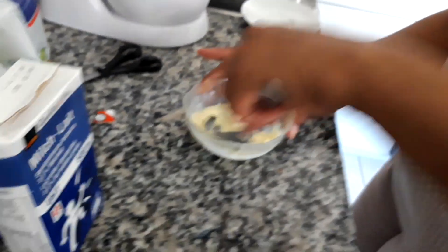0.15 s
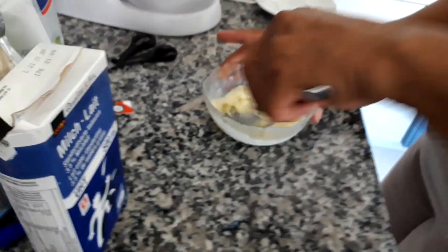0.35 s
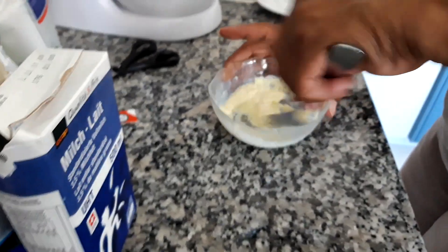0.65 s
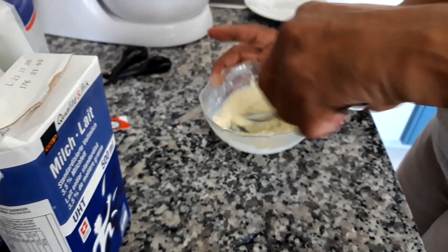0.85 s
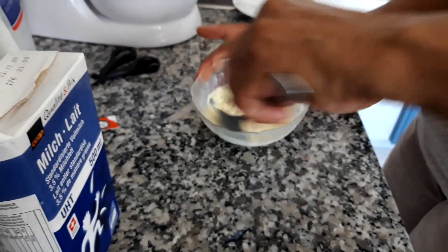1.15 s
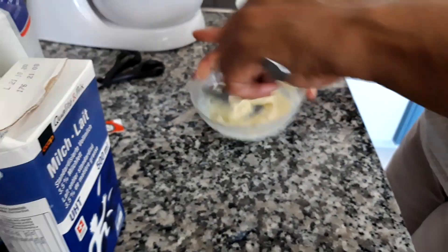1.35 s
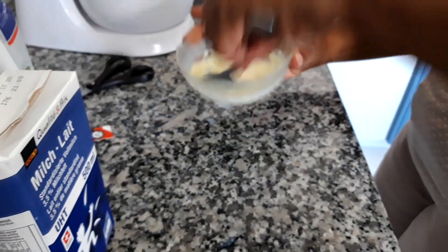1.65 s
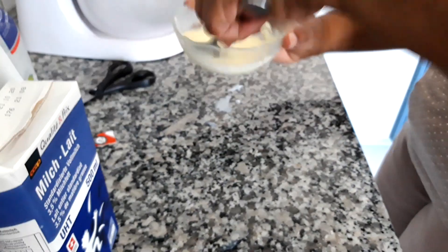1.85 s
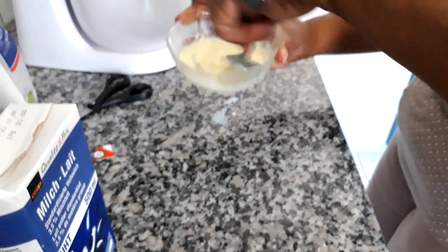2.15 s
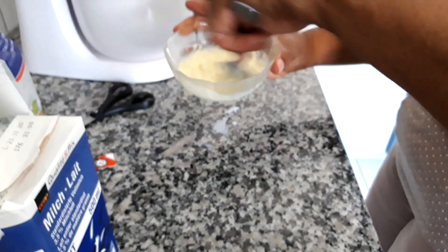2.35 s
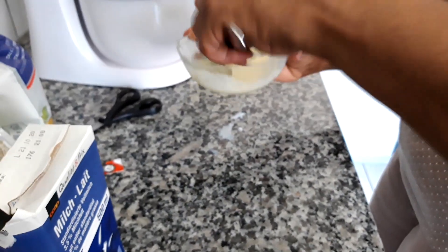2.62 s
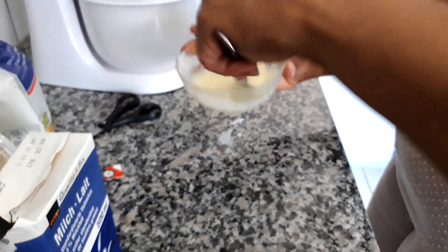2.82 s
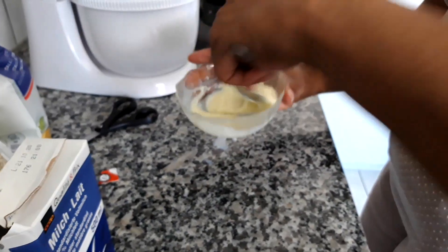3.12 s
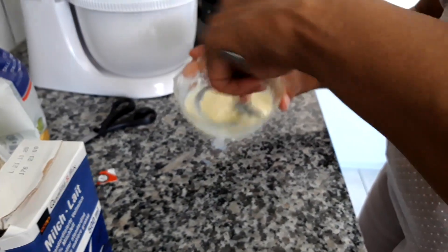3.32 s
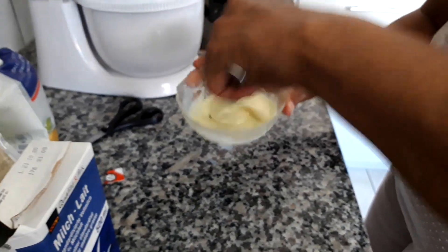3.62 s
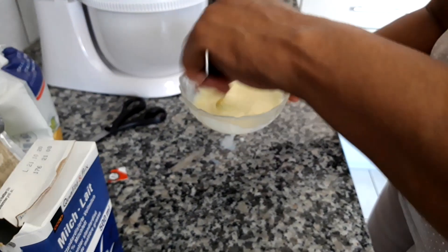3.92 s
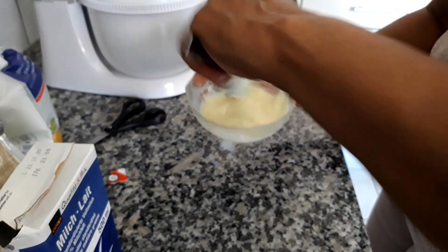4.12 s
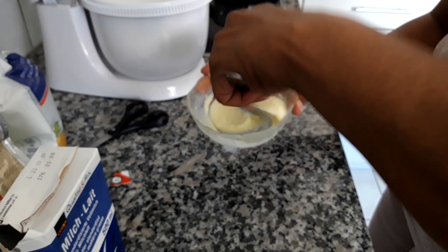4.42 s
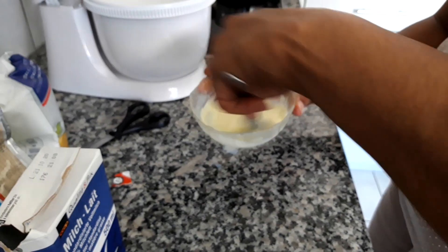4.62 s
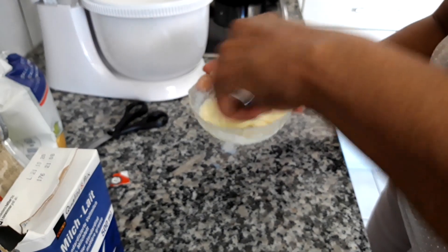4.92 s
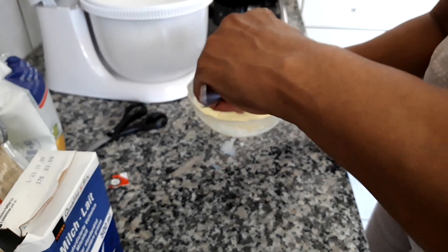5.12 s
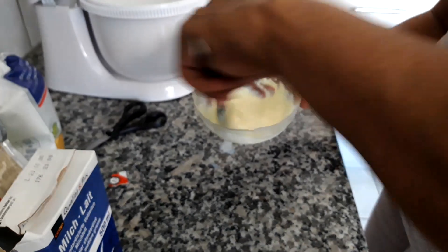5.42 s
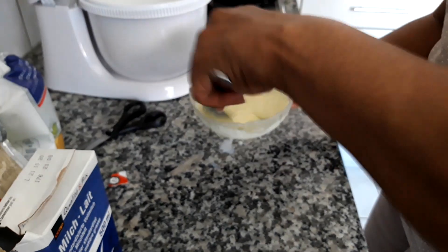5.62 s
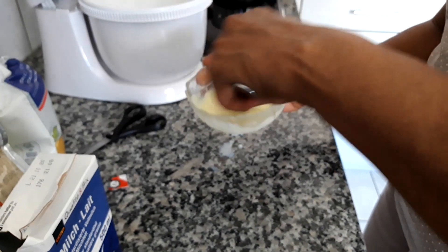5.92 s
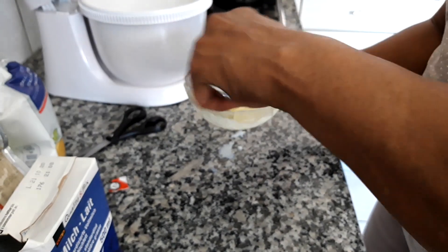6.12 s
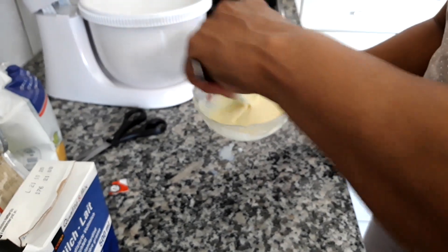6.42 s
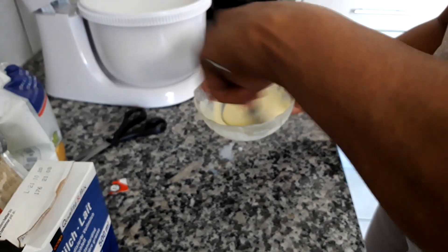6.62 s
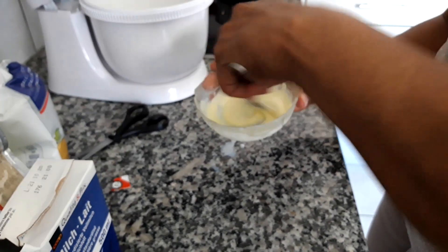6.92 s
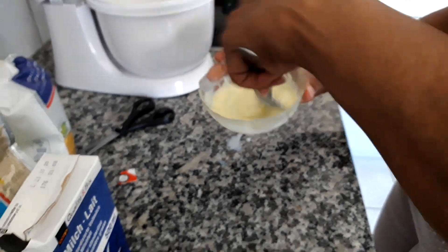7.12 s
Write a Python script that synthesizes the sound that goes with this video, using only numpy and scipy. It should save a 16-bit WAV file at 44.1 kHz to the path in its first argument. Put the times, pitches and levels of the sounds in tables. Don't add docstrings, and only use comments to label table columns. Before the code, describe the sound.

Close in a hard, lively kitchen, a metal spoon stirs thick paste in a small glass bowl. Bright, short clinks arrive several times a second, joined by hollow knocks and soft, gritty scraping. For the first second the bowl also rubs and rumbles on a stone counter; after one more low bump it is held in the air and the stirring continues. Short room echoes follow each hit over a faint distant appliance hum.

```python
import sys
import numpy as np
from scipy import signal
from scipy.io import wavfile
from scipy.ndimage import uniform_filter1d, minimum_filter1d

SR = 44100
rng = np.random.default_rng(int(sys.argv[2]) if len(sys.argv) > 2 else 0)


def master(y):
    cut = np.clip(np.atleast_2d(y).T, -1, 1)
    pcm = np.round(cut * 32767)
    wavfile.write(sys.argv[1], SR, pcm.astype(np.int16))


def volts_from_decibels(level):
    exponent = np.asarray(level, float) / 20
    return 10 ** exponent


N = 320166
TIME_S = np.arange(N) / SR


def unit(x):
    return x / np.sqrt(np.mean(x ** 2) + 1e-20)


def in_time(rows):
    start_s, *columns = np.transpose(rows)
    return [np.interp(TIME_S, start_s, column) for column in columns]


def at_hz(points, hz):
    point_hz, value = np.array(points)[:, :2].T
    return np.interp(np.log(hz), np.log(point_hz), value)


def band(x, low_hz, high_hz):
    return signal.sosfilt(signal.butter(2, [low_hz, high_hz], "band", fs=SR, output="sos"), x)


def above(x, edge_hz):
    return signal.sosfilt(signal.butter(4, edge_hz, "high", fs=SR, output="sos"), x)


def add_at(out, start_s, sound):
    out[round(start_s * SR):][:len(sound)] += sound


# pitch_hz [Hz], level_db [dB per Hz]
HUSH_SPECTRUM = [
    (25, -33),
    (60, -8),
    (100, -1),
    (170, -4),
    (240, -46),
    (400, -15),
    (900, -4.5),
    (2000, -49),
    (5000, -22),
    (16000, -15),
]


def hush():
    edges_hz = 25 * 2 ** (np.arange(29) / 3)
    white = rng.standard_normal((2, N))
    total = np.zeros(N)
    for k, (low, high) in enumerate(zip(edges_hz, edges_hz[1:])):
        centre_hz = np.sqrt(low * high)
        total += volts_from_decibels(at_hz(HUSH_SPECTRUM, centre_hz)) * band(white[k % 2], low, high)
    return volts_from_decibels(-66) * unit(total)


# start_s [s], level_db [dB]
RUMBLE_LEVEL = [(0.0, -40), (0.18, -58), (0.26, -43), (0.44, -55), (0.51, -40.5), (0.58, -51), (.8, -52.5),
                (.88, -67), (.96, -69), (1.05, -84), (1.23, -75), (1.31, -44), (1.43, -74), (4.83, -87),
                (6.95, -77), (7.1, -60), (7.26, -80)]


def rumble():
    white = rng.standard_normal((2, N))
    deep = unit(band(band(white[0], 82, 116), 95, 180))
    upper = unit(band(band(white[1], 130, 243), 92, 400))
    return volts_from_decibels(in_time(RUMBLE_LEVEL)[0] - 5.5) * unit(deep + volts_from_decibels(5.0) * upper)


# pitch_hz [Hz], t60_s [s], echo_db [dB energy above the direct sound]
ROOM = [
    (199, 0.16, -1),
    (440, 0.18, 0),
    (880, 0.25, 2),
    (1930, 0.23, 6.5),
    (3500, 0.24, 5),
    (7000, 0.22, 4),
    (14000, 0.2, 2.5),
]


def kitchen(x):
    gap_s, build_s, pattern_s = 0.0023, 0.0002, 0.31
    t = np.arange(SR // 2) / SR
    rise = 1 - np.exp(-np.maximum(t - gap_s, 0) / build_s)
    hz, _, echo_db = np.transpose(ROOM)
    turn = (TIME_S // pattern_s) % 3
    out = np.zeros(N)
    for k, white in enumerate(rng.standard_normal((3, len(t)))):
        tail = np.zeros(len(t))
        for centre_hz in 110 * 2 ** np.arange(8):
            octave = band(white, centre_hz / np.sqrt(2), centre_hz * np.sqrt(2))
            dying = unit(octave * volts_from_decibels(-60 * t / at_hz(ROOM, centre_hz)) * rise)
            wet = volts_from_decibels(np.interp(np.log(centre_hz), np.log(hz), echo_db))
            tail += wet * dying * np.sqrt(centre_hz / SR / len(t))
        out += signal.fftconvolve(x * (turn == k), np.sqrt(2) * tail)[:N]
    return out


# start_s [s], scrape_db [dB], paste_db [dB]
PRESSURE = [(0.0, -46.5, -46.5), (0.35, -44, -48), (0.7, -51, -48), (1.0, -72, -56), (1.3, -44.5, -53),
            (1.85, -52.5, -56), (2.25, -51, -63.5), (2.55, -54.5, -63), (3.2, -49, -54.5),
            (3.75, -50.5, -57.5), (4.2, -48.5, -70), (4.7, -54.5, -58), (5.1, -48.5, -58.5),
            (5.4, -55, -61.5), (5.9, -55, -60), (6.3, -55, -60), (6.65, -49.5, -57), (7.26, -47.5, -56.5)]
# share of the stroke [0-1], level_db [dB]
STROKE = [
    (0.0, 5.5),
    (0.45, -2.5),
    (0.7, -2),
    (0.9, -9.5),
    (1.0, 2.5),
]
# start_s [s], half_length_s [s], lost_db [dB]
STALLS = [
    (0.992, 0.05, 7.5),
    (1.158, 0.013, 9),
    (2.59, 0.027, 17),
    (2.921, 0.054, 11.5),
    (3.794, 0.074, 3),
    (4.094, 0.015, 17),
    (5.24, 0.067, 11),
    (6.368, 0.017, 4),
    (5.473, 0.059, -3),
    (6.574, 0.022, 7),
]


def drag_levels():
    starts = [row[0] for row in CLINKS] + [N / SR + 0.052]
    share = np.interp(TIME_S, starts, np.arange(len(starts))) % 1
    swell_db = np.interp(share, *np.transpose(STROKE))
    scrape_db, paste_db = in_time(PRESSURE)
    lost_db = np.zeros(N)
    for start_s, half_length_s, level_db in STALLS:
        lost_db += level_db * np.exp(-((TIME_S - start_s) / half_length_s) ** 2)
    return paste_db + 0.96 * swell_db - lost_db, scrape_db + swell_db - lost_db


def drag(groups, level_db, slips_per_s, spread_db, clump_db=6):
    size = np.minimum(rng.exponential(1, N), np.pi)
    slips = (rng.random((3, N)) < slips_per_s / SR) * volts_from_decibels(spread_db * size) * rng.choice([-1, 1], N)
    knots = rng.standard_normal((3, N // 900 + 2))
    clumps = np.array([np.interp(np.arange(N) / 900, np.arange(len(k)), k) for k in knots])
    slips *= volts_from_decibels(clump_db * clumps)
    out = np.zeros(N)
    for k, (hz, mode_db, t60_s) in enumerate(np.concatenate(groups)):
        radius, turn = volts_from_decibels(-60 / (t60_s * SR)), 2 * np.pi * hz / SR
        resonator = [0, np.sin(turn)], [1, -2 * radius * np.cos(turn), radius ** 2]
        out += volts_from_decibels(mode_db) * signal.lfilter(*resonator, slips[k % 3] + 1e-18)
    return volts_from_decibels(level_db) * unit(out)


def grit(scrape_db):
    cracks_per_s = 200
    size = np.minimum(rng.exponential(1, N), 4)
    cracks = (rng.random(N) < cracks_per_s / SR) * volts_from_decibels(3.4 * size) * rng.choice([-1, 1], N)
    return volts_from_decibels(scrape_db - 16.5) * unit(band(cracks, 1700, 13500))


# start_s [s], length_s [s], level_db [dB], pitch_hz [Hz]
SKIDS = [(0.67, 0.18, -59, 4900), (3.807, 0.026, -64, 3830), (5.096, 0.046, -35.5, 2710),
         (5.415, 0.017, -50, 3320), (6.7, 0.016, -41, 7400), (6.455, 0.092, -51, 2560),
         (1.5, 0.11, -58, 1140), (0.43, 0.019, -35, 2170), (2.8, 0.0091, -30, 9500),
         (7.119, 0.023, -32, 3760), (6.39, 0.033, -36.5, 2500), (0.41, 0.018, -43, 1200),
         (3.303, 0.016, -37, 4200), (5.75, 0.025, -34, 3350)]


def skids():
    slips_per_s, half_width = 1300, 0.061
    t, out = np.arange(SR // 4) / SR, np.zeros(N + SR)
    for start_s, length_s, level_db, pitch_hz in SKIDS:
        swell = np.sin(np.pi * np.clip(t / length_s, 0, 1))
        odds, size = rng.random((2, len(t)))
        slips = (odds < slips_per_s / SR) * (2 * size - 1)
        squeal = unit(band(slips, pitch_hz * (1 - half_width), pitch_hz * (1 + half_width)))
        add_at(out, start_s, volts_from_decibels(level_db) * swell * squeal)
    return out[:N]


# start_s [s], level_db [dB peak], pitch_hz [Hz]
THUMPS = [(1.3, -27.5, 563), (1.648, -37, 565), (2.066, -36.5, 470), (2.298, -27.5, 643),
          (2.625, -27.5, 550), (3.021, -37, 641), (3.689, -31, 643), (3.888, -29.5, 721), (4.773, -32, 641),
          (5.865, -33.5, 641), (5.903, -35.5, 641), (5.96, -45, 659), (6.115, -33.5, 560),
          (6.384, -31, 799), (6.799, -37, 649)]


def thumps():
    cycles = 4.3
    t, out = np.arange(SR // 40) / SR, np.zeros(N + SR)
    for start_s, level_db, pitch_hz in THUMPS:
        fade_db = -60 * t * pitch_hz / (2 * cycles)
        add_at(out, start_s, volts_from_decibels(level_db - 1 + fade_db) * np.sin(2 * np.pi * pitch_hz * t))
    return out[:N]


# start_s [s], level_db [dB], pitch_hz [Hz lowest ring], upper_db [dB above it]
PINGS = [(0.2175, -24, 4850, -5), (0.7, -34, 4620, -3), (0.7897, -29, 4030, -7), (0.849, -37, 4100, -10),
         (0.885, -37, 4150, -10), (0.9113, -31.5, 4250, -12), (0.934, -48, 4200, -7),
         (1.9475, -20, 4440, 7), (2.6265, -42, 4500, -13), (3.5565, -37, 4250, -10), (5.743, -26, 4280, 2),
         (6.596, -30, 8500, -5), (6.896, -28, 3740, -11), (7.13, -34, 3530, -9)]
# pitch_hz [Hz], level_db [dB]
SPOON = [
    (6120, -1),
    (8500, 0),
]


def pings():
    t60_s, rise_s = 0.02, 0.00049
    t, out = np.arange(SR // 10) / SR, np.zeros(N + SR)
    envelope = volts_from_decibels(-60 * t / t60_s) * (1 - np.exp(-t / rise_s))
    for start_s, level_db, pitch_hz, upper_db in PINGS:
        rings = np.sin(2 * np.pi * pitch_hz * t)
        for ring_hz, ring_db in SPOON:
            rings += volts_from_decibels(upper_db + ring_db) * np.sin(2 * np.pi * ring_hz * t)
        add_at(out, start_s, volts_from_decibels(level_db) * envelope * rings)
    return out[:N]


# start_s [s], level_db [dB peak]
TICKS = [(0.2156, -16), (0.4636, -12), (0.7002, -18), (0.8794, -32), (1.188, -31), (1.4566, -19),
         (1.947, -8), (2.185, -14), (2.2967, -25), (2.6254, -28), (3.299, -6), (3.5563, -20), (4.2602, -27),
         (4.6154, -26), (4.8423, -15), (5.0554, -37), (5.0988, -30), (5.1124, -41), (5.1174, -44),
         (5.2879, -30), (5.423, -33), (5.6351, -42), (6.0277, -40), (6.1145, -37), (7.0968, -27)]


def ticks():
    out = np.zeros(N)
    start_s, level_db = np.transpose(TICKS)
    out[(start_s * SR).astype(int)] = volts_from_decibels(level_db + 8.5)
    return above(out + 1e-18, 6000)


def colour(usual_db, db_per_octave, favoured_hz, usual_hz):
    return usual_db + db_per_octave * np.log2(favoured_hz / usual_hz)


def strike(blows, groups, longest_s, offset_db, others_up_db, favour_db, scatter_db, detune, contact_s, chatter_s):
    hz, mode_db, t60_s = np.concatenate(groups).T[:, :, None]
    in_group = np.repeat(np.eye(len(groups)), [len(group) for group in groups], axis=1)
    t = np.arange(SR // 40) / SR
    clean, chattered = np.zeros((2, N + SR))
    decay_db = -60 * t / np.minimum(t60_s, longest_s)
    antiphase = (-1) ** np.arange(len(hz))[:, None]
    rise = (1 - np.exp(-t / contact_s)) ** 2 * antiphase
    for start_s, first_db, *others_db, favoured_hz in blows:
        size, shift = rng.standard_normal((2, len(hz), 1))
        pitch_hz = hz * (1 + detune * shift)
        octaves_off = np.minimum(abs(np.log2(hz / favoured_hz)), 1)
        level_db = mode_db + scatter_db * size - 12 * octaves_off
        nearest = np.argmin(abs(hz - favoured_hz))
        pitch_hz[nearest] = favoured_hz
        level_db[nearest] += min(favour_db, 4)
        rings = in_group @ (rise * volts_from_decibels(level_db + decay_db) * np.sin(2 * np.pi * pitch_hz * t))
        group_db = first_db + offset_db + np.r_[0, np.add(others_db, others_up_db)]
        blow = volts_from_decibels(group_db) / np.linalg.norm(rings, axis=1) @ rings
        add_at(clean, start_s, blow)
        touches = rng.standard_normal(len(t)) ** 3 * np.exp(-t / chatter_s)
        touches[0] = 34.2
        add_at(chattered, start_s, signal.fftconvolve(blow, touches / np.linalg.norm(touches)))
    return np.array([clean[:N], chattered[:N]])


# start_s [s], hollow_db [dB], thud_db and
# rim_db [dB above hollow], pitch_hz [Hz favoured]
KNOCKS = [(0.013, -31, -23, 4.5, 1460), (0.217, -27, -9, -2, 1280), (0.387, -28, -21, -2.5, 1130),
          (0.464, -27, -5.5, -5, 1130), (0.5003, -13, -14.5, -10, 1075), (0.703, -27.5, -10, -3.5, 1369),
          (1.19, -27.5, -8.5, -10.5, 830), (1.301, -18, -13, -7, 1000), (1.433, -28.5, -14, -20, 1000),
          (1.457, -31.5, -17, -4.5, 880), (1.723, -27.5, -8, -4, 1110), (1.946, -26, -7, -15, 780),
          (2.189, -23.5, -26, -8.5, 1010), (2.298, -24.5, -7.5, -16, 906), (2.393, -17.5, -17, -15.5, 1110),
          (2.625, -33, -1, -0.5, 490), (3.103, -15, -28, -7, 1490), (3.298, -26, -10.5, -1.5, 1490),
          (3.479, -32, -7.5, -14, 1010), (3.557, -25.5, -12.5, -1, 2412), (3.888, -27.5, -4.5, -5, 750),
          (4.402, -22, -16, -6.5, 1277), (4.577, -27.5, -5, -5, 1010), (4.772, -36.5, 0.5, -2, 695),
          (5.514, -22, -31, -8.5, 1520), (5.742, -28, -16, -4.5, 1010), (6.026, -30, -9, -5, 1440),
          (6.384, -31.5, -2, -6, 883), (6.649, -24, -27, -5.5, 1500), (7.018, -28.5, -4.5, -8.5, 628),
          (7.097, -35, -7.5, -1, 1490),
          (0.4936, -30.5, -21, 6, 1880), (0.592, -36, -22, -13, 1000), (0.672, -38.5, 0, -8, 894),
         (0.763, -36, -14, -6, 1130), (0.828, -36, -25, -27, 1080), (1.091, -40, -5, -11.5, 1010),
         (1.12, -37, -11.5, -27, 1130), (1.359, -35, -8.5, -11, 1160), (1.505, -40, -23, -4, 980),
         (1.648, -42, 4, -10, 585), (1.904, -45, 0.5, -12, 990), (2.066, -50, 9.5, -2, 447),
         (2.101, -51.5, 5.5, -10, 574), (2.274, -42, -4, -7, 1210), (2.494, -46.5, 7, -17, 550),
         (2.76, -44, -25, -13, 1170), (2.794, -39.5, -2.5, 2, 779), (2.868, -40.5, -7, -12, 870),
         (2.961, -42.5, -9, -4, 1010), (3.022, -37.5, -2.5, -13, 605), (3.262, -53, 8, -6, 605),
         (3.84, -46, -13, -20, 1010), (3.968, -44.5, 0.5, 2.5, 762), (4.263, -45, -28, -5.5, 1490),
         (4.84, -33.5, -4.5, -5, 1410), (4.964, -40, -4.5, -25, 970), (5.065, -57, -23, 13, 2360),
         (5.259, -53.5, 1, -12, 800), (5.379, -53, -6, -4, 1470), (5.669, -38, -4, -3.5, 1490),
         (5.866, -42.5, 1.5, 3, 616), (5.904, -46, 6.5, -9, 620), (6.007, -46, -11, -12, 1160),
         (6.115, -40, -0.5, -3, 586), (6.16, -54, -10, 13, 1480), (6.256, -62, 6, -12, 530),
         (6.273, -50, -4, -12, 945), (6.716, -47, 0, 1, 770), (6.799, -37.5, -4, -7, 1010),
         (6.849, -38.5, -2.5, -15, 720)]
# start_s [s], glass_db [dB], glass_hz [Hz], body_db [dB], body_hz [Hz]
BLOWS_ON_BOTH = [(0.247, -35, 4170, -25.5, 1510), (0.306, -28, 4160, -24, 1290), (0.5, -32, 2820, -27.5, 2200),
                 (1.519, -23, 3670, -27.5, 1366), (1.7573, -16.5, 3446, -29.5, 896),
                 (1.974, -37, 3600, -29.5, 1030), (3.3447, -15, 3880, -24.5, 1450),
                 (4.161, -20.5, 5570, -48, 2570), (4.656, -12.5, 3753, -28, 1520),
                 (4.8784, -21.5, 3500, -33, 1490), (5.1093, -31.5, 3720, -46.5, 2780),
                 (5.2894, -25.5, 5550, -50, 2680), (6.171, -30.5, 4670, -36.5, 1810),
                 (6.4587, -36, 9500, -47, 2580), (6.5945, -24, 7900, -47, 1570), (6.894, -13, 3417, -25.5, 1480),
                 (7.129, -10, 3500, -24.5, 1040), (1.2924, -37, 10000, -69, 1000),
                 (2.6877, -37, 6120, -59, 1000), (3.689, -38, 6200, -32, 763), (4.376, -39, 4270, -55, 1000),
                 (4.547, -43, 9200, -60, 1000), (5.961, -38.5, 3770, -36.5, 930)]


def body_blows():
    blows = KNOCKS
    for start_s, _, _, level_db, pitch_hz in BLOWS_ON_BOTH:
        thud_db = colour(-10.5, -11, pitch_hz, 1000)
        rim_db = colour(-12, 14.4, max(pitch_hz, 1000), 1000)
        blows = blows + [(start_s, level_db, thud_db, rim_db, pitch_hz)]
    return blows


# pitch_hz [Hz], level_db [dB], t60_s [s]
BOWL = [
    [(1010, 8.5, 0.032), (1130, -2.5, 0.081), (1244, 3.5, 0.028)],
    [(359.5, -12, 0.11), (447, -4, 0.0076), (574, -3, 0.047), (709, 4, 0.0083), (796, -4, 0.018)],
    [(1490, -4.5, 0.04), (1850, -7, 0.02), (2058, -13, 0.014), (2274, -1, 0.016), (2560, -2.5, 0.024),
     (2850, -3.5, 0.0093)],
]


def bowl_body(paste_db):
    knocks = strike(body_blows(), BOWL, longest_s=0.013, offset_db=19.0, others_up_db=5, favour_db=12,
                    scatter_db=3.0, detune=0.033, contact_s=0.00082, chatter_s=0.0063)
    return above(knocks + drag(BOWL, paste_db + 4.5, slips_per_s=1200, spread_db=2.8), 357)


# start_s [s], lower_db [dB], middle_db and upper_db [dB above lower], pitch_hz [Hz favoured]
CLINKS = [(0.0014, -19, -11, -12, 4680), (0.2168, -6, -9.5, -9.5, 4800), (0.4637, -4.5, -11.5, -9, 4600),
          (0.6993, -13.5, -8, -8.5, 4560), (1.1886, -21, -6, -9.5, 5040), (1.4578, -12.5, -3, -4, 5705),
          (1.723, -5.5, -5, -6.5, 4170), (1.947, -6.5, -4, -3, 4540), (2.186, -15.5, -3, -7, 6170),
          (2.392, -17, -11, -17.5, 3400), (2.6259, -22, -8, -10, 4570), (2.7938, -24.5, -13, -12, 3940),
          (2.961, -34, -11, -16, 3500), (3.1047, -8.5, -7, -4, 3670), (3.298, -5.5, -2, 0.5, 8440),
          (3.556, -11, -6, -9, 6230), (3.888, -18, -11, -6.5, 4420), (4.13, -17, -10.5, -1, 9570),
          (4.2616, -17, -12, -8, 4050), (4.4026, -20, -12, -15, 4000), (4.6155, -10.5, -10, -9.5, 4010),
          (4.8418, -6, -9.5, -8, 4120), (5.2558, -29, -12, -4.5, 3750), (5.515, -22.5, -21, -22, 3640),
          (5.7414, -12, -7.5, -12.5, 4170), (6.027, -14.5, -22, -27, 3950), (6.385, -23.5, -20, -19, 3910),
          (6.649, -17.5, -8, -13.5, 3750), (6.851, -22, -5.5, -10, 4040), (7.0975, -12, -7.5, -9.5, 4730)]
# deep_db [dB above lower], top_db [dB above upper]
SHADES = [(-12, -12), (-25, -3), (-20, -6.5), (-20, 0), (-27, -10), (-28, -3.5), (-18, -10), (-18.5, -10),
          (-11, -4), (1, -2), (-21, -3), (-18, -10), (-5, -7), (-7, -5.5), (-13, -8), (-13, -4), (-18, -5),
          (-6.5, -10), (-17, -9), (-14, -3), (-17, -11), (-21, -9), (-7, -7), (-2, -6), (-9, -2),
          (-10.5, -5), (-17, 0), (-2, -5), (-15, -9), (-11, -12)]
# start_s [s], lower_db [dB], upper_db [dB above lower], pitch_hz [Hz favoured]
GRAZES = [(0.133, -52, -4, 9300), (0.373, -46, -3, 6500), (0.605, -40.5, 3, 9100),
          (0.7904, -31.5, -11, 5000), (0.881, -45, -4, 7000), (0.933, -42.5, -5.5, 5100),
          (1.042, -45.5, -2.5, 8800), (1.065, -40.5, -4, 9100), (1.102, -38.5, -5.5, 9200),
          (1.177, -44, -6, 5040), (1.3627, -28, -15, 5500), (1.433, -42, 6.5, 9700), (1.648, -37, -6, 5100),
          (1.903, -34, -2, 9600), (2.101, -37.5, -3.5, 6290), (2.28, -34, -4, 4010), (2.377, -51, 8, 7000),
          (2.397, -35, -14, 3240), (2.495, -50, 1, 5500), (2.827, -47, 4, 3840), (2.982, -44, -1, 9400),
          (3.8076, -39.5, -1, 3840), (3.995, -31, -5, 2700), (4.0163, -34, -10, 4020),
          (4.577, -24.5, -9, 4100), (4.776, -21.5, -13.5, 3590), (4.98, -33, -5.5, 3470),
          (4.1225, -42, -10, 3900), (5.043, -42, -18, 4000), (5.0605, -34.5, -4.5, 9100),
          (5.351, -38, -2.5, 9260), (5.421, -46, 0, 3220), (5.6696, -35.5, -15, 3540),
          (5.865, -33.5, -3, 9200), (5.904, -36, -16, 3700), (6.115, -32, -7, 3830),
          (6.4764, -30, -9, 7150), (6.498, -28, -9, 3900), (6.5767, -31, -6.5, 6400),
          (7.0184, -24.5, -6.5, 3340)]


def glass_blows():
    blows = []
    for (start_s, lower_db, middle_db, upper_db, pitch_hz), (deep_db, top_db) in zip(CLINKS, SHADES):
        blows.append((start_s, lower_db, deep_db, middle_db, upper_db, upper_db + top_db, pitch_hz))
    light = [(start_s, lower_db, upper_db - 3.5, upper_db, pitch_hz)
             for start_s, lower_db, upper_db, pitch_hz in GRAZES]
    for start_s, level_db, pitch_hz, _, _ in BLOWS_ON_BOTH:
        middle_db = colour(-10, 5, pitch_hz, 4000)
        upper_db = colour(-11, 7.8, pitch_hz, 4000)
        light.append((start_s, level_db, middle_db, upper_db, pitch_hz))
    for start_s, lower_db, middle_db, upper_db, pitch_hz in light:
        deep_db = colour(-9, -17, pitch_hz, 4000)
        blows.append((start_s, lower_db, deep_db, middle_db, upper_db, upper_db - 5.5, pitch_hz))
    return blows


# pitch_hz [Hz], level_db [dB], t60_s [s]
GLASS = [
    [(3922, -8, 0.023), (4210, -10, 0.016), (4203, 4.5, 0.0047), (4618, -9, 0.017), (4897, -3, 0.0056)],
    [(3353, 11, 0.0013), (3606, -1.5, 0.012)],
    [(5500, 3, 0.0046), (5570, 18.5, 0.0016), (5890, 12.5, 0.0036), (6320, 10, 0.0043), (6880, 6, 0.0042),
     (7280, 8, 0.0045)],
    [(8030, -4, 0.019), (8620, 8.5, 0.0047), (9100, 2.5, 0.027), (9600, 18.5, 0.0023), (8900, 2, 0.015)],
    [(10560, 1.5, 0.0059), (11280, -1.5, 0.018), (11970, -10.5, 0.013), (13000, 8, 0.0017),
     (14700, 8, 0.002)],
]


def glass_wall(scrape_db):
    clinks = strike(glass_blows(), GLASS, longest_s=0.011, offset_db=12.5, others_up_db=5.5, favour_db=13.5,
                    scatter_db=0.0, detune=0.027, contact_s=0.00028, chatter_s=0.009)
    return above(clinks + drag(GLASS, scrape_db, slips_per_s=3000, spread_db=3.6), 1820)


def scene():
    paste_db, scrape_db = drag_levels()
    small_sounds = grit(scrape_db) + skids() + thumps() + pings() + ticks()
    clean, chattered = bowl_body(paste_db) + glass_wall(scrape_db) + small_sounds
    return (hush() + rumble() + kitchen(clean) + chattered)[None]


def top_cut(x):
    return signal.sosfilt(signal.butter(12, 17030, fs=SR, output="sos"), x)


def record(dry):
    limit, cutoff_hz = 0.97, 15900
    room_left = minimum_filter1d(np.minimum(1, limit / (abs(dry) + 1e-9)), size=177)
    held = dry * uniform_filter1d(room_left, size=89)
    low_pass = signal.cheby2(10, 40, cutoff_hz * 1.03, fs=SR, output="sos")
    return top_cut(signal.sosfilt(low_pass, held))


dry = scene()
out = record(dry)
master(out)
```